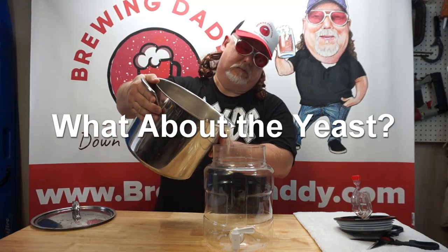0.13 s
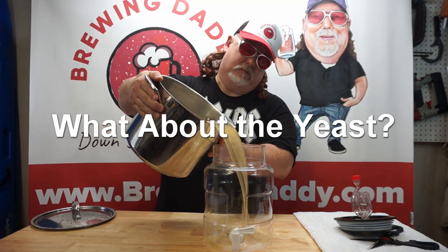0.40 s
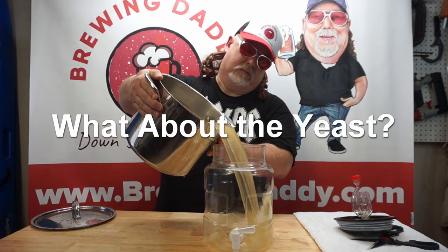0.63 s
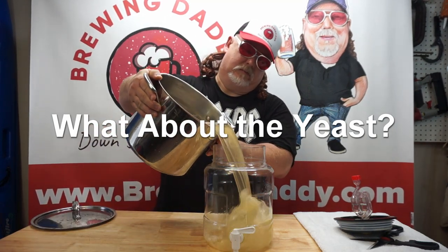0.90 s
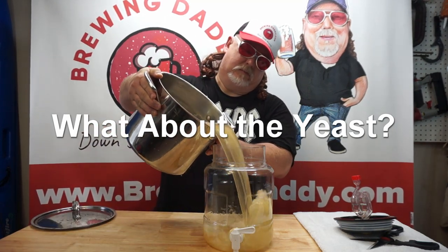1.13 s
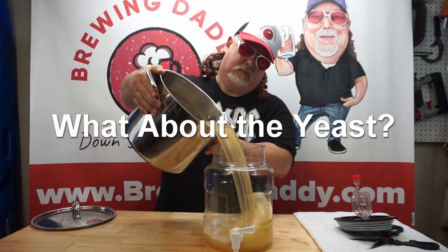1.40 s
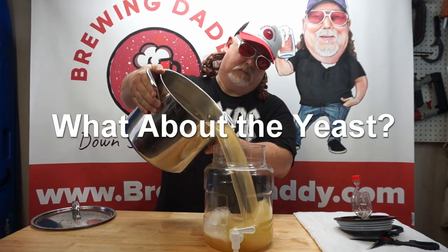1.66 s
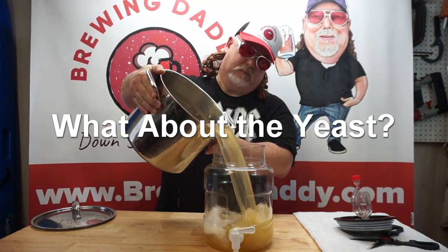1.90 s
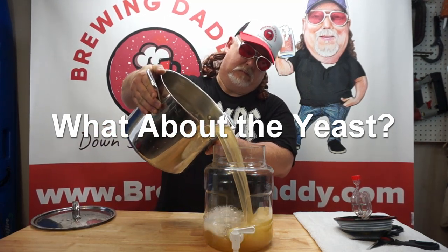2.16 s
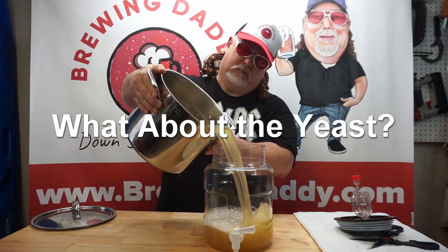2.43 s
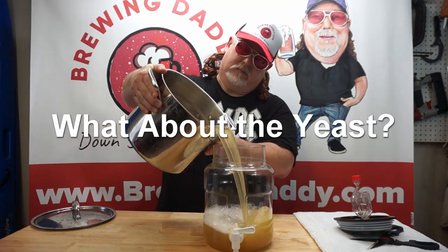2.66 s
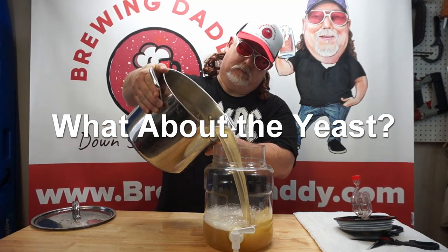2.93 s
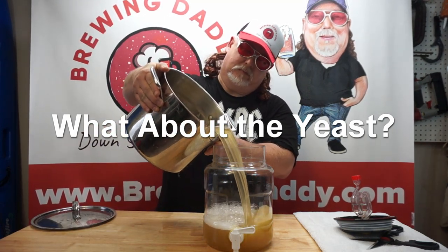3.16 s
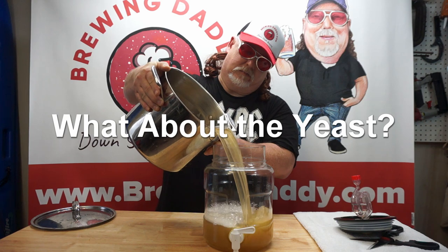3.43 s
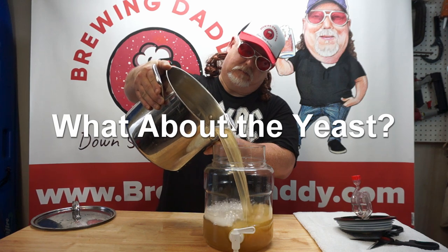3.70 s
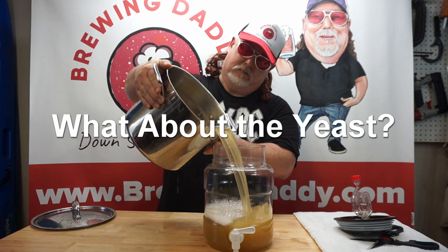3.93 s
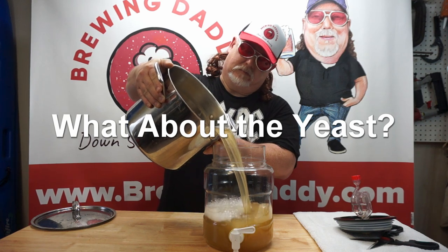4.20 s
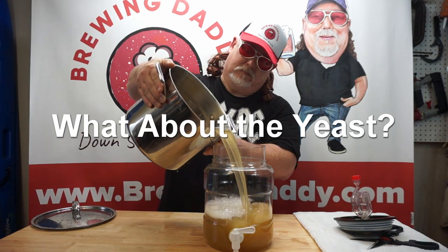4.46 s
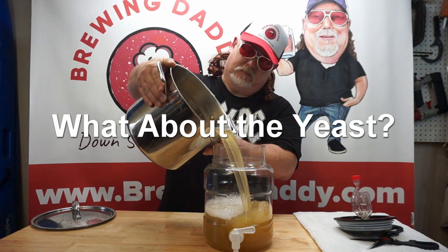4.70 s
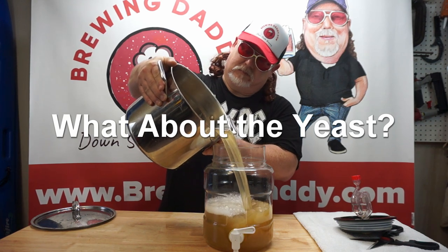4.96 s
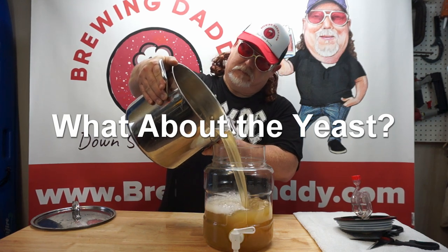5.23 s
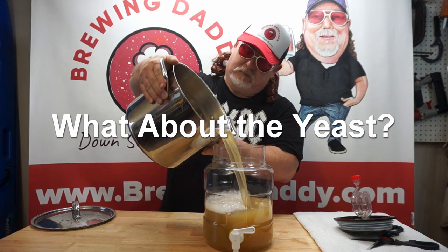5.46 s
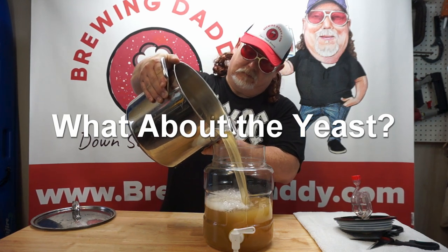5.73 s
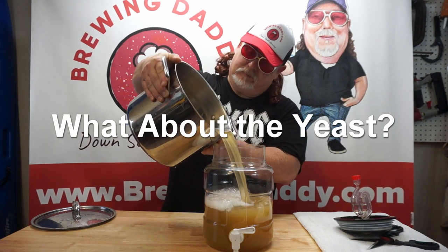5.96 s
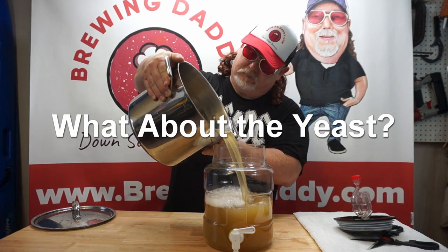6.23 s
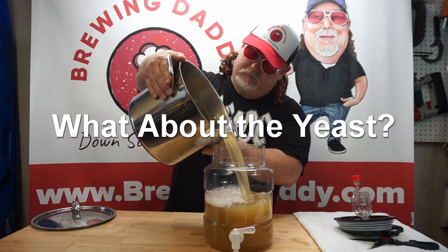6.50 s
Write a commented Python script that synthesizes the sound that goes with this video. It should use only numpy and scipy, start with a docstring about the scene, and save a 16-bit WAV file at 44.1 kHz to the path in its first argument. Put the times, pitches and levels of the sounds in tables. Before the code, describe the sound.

Close stereo sound of liquid poured into a wide, hollow plastic jar in a quiet, lightly echoing room. Only soft low room noise and hiss until 0.33 s, when a first drop taps the dry bottom; sharper, ringing knocks follow around 0.5 s. From 0.55 s bright splatter and bubble plips build, with an uneven hollow gurgle. Between 1.0 and 2.4 s the pour is fullest: dense mid-pitched bubbling, crackling spray, jar walls drumming, and deep dull thumps near 250 Hz, strongest at 1.5, 1.8 and 2.1 s. After 2.5 s it fades as foam covers the surface; lesser, slightly higher thuds come at 2.9, 3.4 and 3.9 s among isolated droplets. From 4.2 s only a soft, fizzy trickle remains, with small bubble flurries and faint plips, growing quieter but still running at 6.6 s.

```python
"""Liquid is poured from a steel pot into a wide plastic jar on a table in a quiet room.
First a few drops knock on the dry bottom, which rings as a set of dying tones.
Then the jet drums on the empty jar (noise through wall tones), and slugs of liquid thump it (low dying tones).
Trapped bubbles ring in the jar's air (swarms of short sines) and spray crackles (tiny, high rings and bursts).
As foam builds up the splashing sinks to a soft fizz with single plips; quiet room noise runs throughout."""
import sys
import numpy as np
from scipy import signal
from scipy.fft import rfft, irfft, next_fast_len
from scipy.io import wavfile
from scipy.ndimage import uniform_filter1d

SR = 44100
rng = np.random.default_rng(int(sys.argv[2]) if len(sys.argv) > 2 else 0)


def put_to_file(sound):
    """Save the sound as 16-bit audio at rate SR, in the file named by the first command-line argument."""
    columns = np.atleast_2d(sound).T  # one column per channel
    safe = np.clip(columns, -1, 1)
    whole_steps = np.round(safe * 32767)
    wavfile.write(sys.argv[1], SR, whole_steps.astype(np.int16))


def gain_from_db(level_db):
    """Turn a decibel level (scalar or array-like) into a linear amplitude factor."""
    decades = np.asarray(level_db, float) / 20
    return 10 ** decades


N = 291589  # length in samples

# Table levels are relative: the functions below add their own offsets.
# First drops on the dry bottom: start_s, level_db, tilt_db_per_octave
DRY_DROPS = [(.3252, -45, 0), (.3376, -26.5, 1), (.3444, -51, 9), (0.478, -29.5, 14), (0.5169, -19, 8.5)]
# Tones of the thin bottom: pitch_hz, level_db, t60_s (time to fall by 60 dB)
BOTTOM_TONES = [(475, 0, 0.14), (656, 4, 0.12), (902, -4, .12), (1400, -7, 0.22), (1550, -1, 0.078),
                (1930, -7, 0.13), (1930, 5.5, 0.081), (2290, -3, .08), (3050, 0, 0.074), (3300, 3, 0.035),
                (3440, -13, 0.033), (4930, -27, 0.1)]
# Level of the small bubbles: time_s, level_db
BUBBLE_LEVEL = [(0.33, -55), (0.35, -42.5), (0.45, -58.5), (0.52, -33), (0.59, -35.5), (0.75, -26),
                (0.77, -30.5), (0.85, -29.5), (0.98, -32), (1.1, -25), (1.12, -31.5), (1.24, -34),
                (1.36, -29.5), (1.5, -29), (1.52, -27.5), (2.08, -32.5), (2.18, -39.5), (2.24, -36),
                (2.86, -43.5), (3.95, -43), (3.98, -38.5), (4.06, -46), (4.11, -40), (4.16, -46.5),
                (5.11, -55), (6.61, -59)]
# Level of the big air pockets, which the slosh follows: time_s, level_db
POCKET_LEVEL = [(0.33, -56), (0.35, -46), (0.38, -51), (1.05, -33.5), (1.1, -30), (1.26, -40.5),
                (1.32, -33), (1.85, -32), (2.86, -50.5), (2.9, -45.5), (3.13, -52.5), (3.18, -46),
                (4.0, -45.5), (4.32, -57), (4.35, -51), (4.4, -55), (4.65, -60.5), (6.61, -81.5)]
# Clusters of bubbles that boil up through the foam: start_s, lift_db
BUBBLE_SURGES = [(1.67, 6), (1.94, 2), (2.06, -0.5), (2.42, 2), (2.6, 1.5), (2.75, 5.5), (3.0, 2), (3.2, 1),
                 (3.43, 1.5), (3.75, 1.5), (4.37, 5.5), (4.53, 2), (4.69, 3.5), (4.83, 7), (5.08, 4),
                 (5.17, 3), (5.34, 6.5), (5.6, 3.5), (5.77, 0), (5.85, 2), (6.11, 3.5), (6.22, 4.5),
                 (6.38, 1), (6.55, 7)]
# Loudest single bubbles: start_s, level_db, pitch_hz, t60_s
LOUD_PLIPS = [(0.5176, -27, 2380, 0.052), (.5473, -19, 2090, 0.017), (0.6178, -22.5, 2700, 0.033),
              (0.7355, -17.5, 3150, 0.017), (.8636, -15.5, 2140, 0.022), (1.0176, -21, 2740, 0.063),
              (1.0883, -24, 904, 0.11), (1.332, -20.5, 1670, 0.048), (1.3629, -18, 1696, 0.043),
              (1.52, -18, 1653, 0.067), (1.576, -21, 1600, .032), (1.6145, -13.5, 1560, 0.049),
              (1.7436, -13.5, 2050, 0.022), (2.241, -24, 1640, 0.031), (2.325, -26, 2860, 0.036),
              (2.642, -29.5, 1550, 0.054), (2.9305, -34, 1020, .048), (3.004, -32.5, 2200, .04),
              (3.4351, -28.5, 1100, 0.025), (3.7416, -36.5, 1130, 0.099), (3.9768, -33, 2724, 0.1),
              (4.305, -47, 2420, .027), (4.344, -36.5, 1130, 0.13), (4.5324, -34.5, 2540, 0.038),
              (4.6279, -39, 2380, .032), (4.69, -47, 2750, .06), (4.833, -42, 3040, 0.05),
              (5.36, -50, 2700, .04), (5.6, -48, 2030, 0.12), (5.846, -38, 2000, 0.054),
              (5.99, -44.5, 1990, 0.036), (6.2343, -45, 2450, 0.028), (6.5661, -39.5, 2000, 0.058)]
# Spectrum of the small bubbles: frequency_hz, level_db_per_hz
BUBBLE_SPECTRUM = [(820, -35), (1400, -18.5), (1640, -2.5), (1900, -6), (2070, -1), (2500, -2),
                   (2720, -1.5), (4500, -19), (5850, -113), (9900, -120)]
# Air pockets in shallow liquid: frequency_hz, level_db_per_hz
SHALLOW_POCKETS = [(240, -29), (400, -3.5), (488, -7), (568, -4), (644, -7.5), (906, -6), (1400, -10),
                   (1820, -20), (3080, -120)]
# Air pockets in deep liquid: frequency_hz, level_db_per_hz
DEEP_POCKETS = [(240, -34), (400, -11.5), (461, -17), (560, -10), (669, -9.5), (851, -14.5), (1100, -5),
                (1400, -14.5), (1820, -18), (3080, -120)]
# How far the pockets have turned into deep-liquid ones: time_s, share_0_to_1
DEEP_SHARE = [(1.7, 0), (2.6, 1)]
# Tones of the air inside the jar: pitch_hz, width_hz, level_db over the open sound
AIR_TONES = [(443, 140, -5.5), (563, 12.3, 2), (923, 12, -1), (1106, 13.6, 4.5), (1130, 12, -17),
             (1255, 57, -2), (1464, 470, -12), (2000, 35, -9), (2380, 23, -9), (2726, 26, -7),
             (3040, 7.5, -22)]
# Foam smothers the treble: time_s, spray_db over bubbling, mist_db over bubbling
FOAM_COVER = [(.33, -6, -6.5), (.42, -16, -16), (.48, -16, -13), (.7, -7.5, -9.5), (1.1, -14, -14),
              (1.25, -7.5, -8.5), (1.6, -13.5, -14.5), (2.05, -11.5, -13.5), (2.25, -15, -13.5),
              (2.45, -18, -24), (2.8, -16.5, -21.5), (3.1, -18, -27), (3.5, -15, -20), (3.8, -22.5, -21),
              (4.1, -15.5, -25), (5, -14, -22.5), (6.61, -12, -34)]
# Sharp drops of spray: start_s, level_db, pitch_hz
SPRAY_TICKS = [(0.4646, -34.5, 8410), (.4851, -33, 10300), (0.517, -35, 9500), (0.547, -31, 8000),
               (0.5576, -21.5, 5320), (0.6187, -24, 4240), (0.9305, -28, 8900), (.998, -24.5, 4370),
               (1.2574, -31, 4760), (2.1885, -27.5, 5970), (2.266, -29, 4320), (2.4806, -34.5, 4680),
               (2.5235, -41, 9200), (2.6088, -29, 4180), (2.763, -33, 5300), (2.8028, -43, 10000),
               (3.038, -45, 6240), (3.203, -40, 5200), (3.4433, -36, 5930), (3.6344, -35, 5560),
               (3.7128, -34, 5970), (3.7628, -29.5, 6700), (3.8075, -44, 8200), (3.839, -39, 5700),
               (3.988, -40, 4540), (4.099, -43, 5450), (4.3868, -46, 5950), (4.406, -37.5, 5200),
               (4.67, -39, 4280), (5.5591, -41.5, 4360), (5.9467, -49, 4740)]
# Lift from the burst of smaller drops around each tick: spray_db, mist_db
SPATTER_LIFT = [5.5, 2]
# Spectrum of the spray: frequency_hz, level_db_per_hz
SPRAY_SPECTRUM = [(2650, -30), (4500, 3.5), (5140, 5), (5920, 6), (6470, 1.5), (7020, 2.5), (7500, -30),
                  (9750, -41), (16500, -120)]
# Spectrum of the finest drops: frequency_hz, level_db_per_hz
MIST_SPECTRUM = [(4410, -30), (7500, 2), (10000, 1), (13200, -13), (15600, -20)]
# Spectrum of bursting foam cells: frequency_hz, level_db_per_hz
FIZZ_SPECTRUM = [(4600, -25), (5200, -7), (5600, 2.5), (5950, -4.5), (6400, 0), (6900, -12), (7500, -30)]
# Thrust of the jet on the jar: time_s, level_db
JET_THRUST = [(.33, -46), (.45, -47), (.55, -54.5), (.8, -40.5), (1.2, -42.5), (1.33, -26.5), (1.45, -32.5),
              (1.6, -29), (1.9, -29), (2.15, -33), (2.45, -44), (2.551, -39), (2.8, -45.5), (3.1, -48.5),
              (3.25, -39.5), (3.33, -53), (3.4, -36.5), (3.55, -40.5), (3.65, -48.5), (3.85, -43),
              (3.93, -40), (4.2, -49.5), (4.5, -62), (4.7, -67), (5.2, -76), (5.4, -61), (5.7, -75),
              (6.61, -71)]
# Part of the thrust that shakes the empty jar, not the loaded one: time_s, share_0_to_1
EMPTY_SHARE = [(.3, 0.82), (1.2, 0.99), (1.9, 0.64), (2.3, 0.4), (2.7, 0.09), (4, 0), (4.6, 0.06),
               (6.6, 0.3)]
# Slugs of liquid that thump the jar: start_s, level_db, pitch_hz, t60_s
SLUG_THUMPS = [(0.335, -34, 253, 0.18), (0.822, -32, 245, 0.15), (1.016, -27, 263, 0.13),
               (1.128, -22.5, 247, 0.17), (1.28, -35, 242, 0.12), (1.329, -21.5, 253, 0.24),
               (1.518, -12.5, 238, 0.11), (1.612, -19.5, 281, 0.21), (1.706, -18.5, 266, 0.07),
               (1.811, -8, 264, 0.11), (1.942, -22, 260, 0.13), (2.108, -12.5, 266, 0.065),
               (2.206, -13.5, 284.4, 0.11), (2.329, -25.5, 263, 0.14), (2.377, -18, 296, 0.075),
               (2.481, -20.5, 281, 0.11), (2.588, -28.5, 288.3, 0.33), (2.663, -21, 276, 0.073),
               (2.889, -23.5, 286, 0.18), (2.939, -16.5, 282.6, 0.13), (3.156, -31.5, 313, 0.15),
               (3.442, -20.5, 285, 0.15), (3.878, -21, 290, 0.25), (3.973, -37, 276, 0.21)]
# Wall and table tones: pitch_hz, width_hz (before widening), empty_db, loaded_db
WALL_TONES = [(95, 15, -16.5, -39), (203, 10, -4.5, -36), (247, 17.8, 1.5, -14), (288.3, 13.1, -9.5, 8),
              (294.4, 103, -17, 1.5), (373.4, 8.9, -5, -36), (399.6, 17, -8.5, -45)]
# Slosh rumble over the pockets: time_s, level_db
SLOSH_LEVEL = [(.33, -9), (1, -17.5), (1.7, -14), (2.7, -9.5), (3.5, -16), (4.3, -9.5), (5.3, -5.5),
               (6.61, 8)]
# Spectrum of the slosh: frequency_hz, level_db_per_hz
SLOSH_SPECTRUM = [(30, -26), (70, -8), (95, 4.5), (140, 2.5), (250, -3), (400, -0.5), (600, -48),
                  (1000, -60)]
# How long the room echoes: frequency_hz, t60_s
ECHO_TIMES = [(100, 0.13), (500, 0.59), (2000, 0.47), (6000, 0.59), (14000, 0.13)]
# Echo over the direct sound: frequency_hz, level_db
ECHO_LEVELS = [(60, -26), (250, -24), (420, -14), (700, -9), (1200, -7), (2000, -6), (3200, -3), (4500, 4),
               (6500, 1), (9000, 0), (14000, 1)]
# Room air and microphone hiss: frequency_hz, level_db_per_hz
HUSH_SPECTRUM = [(15, -43), (25, -2), (70, -9.5), (129, -9), (169, -6.5), (227, -5), (616, -8.5),
                 (947, -12), (6410, -24.5), (11300, -26.5), (15600, -32)]
# Left-right likeness of that noise: frequency_hz, likeness_0_to_1
HUSH_LIKENESS = [(50, 0.77), (300, 0.1), (1500, 0.067), (5000, 0.067), (15000, 0.033)]
# Balance of the two ports: frequency_hz, left_minus_right_db
PORT_BALANCE = [(60, -1), (180, -0.5), (550, -1), (1650, -4.5), (4970, -3.5), (15000, -3.0)]
# How far the left port is ahead: frequency_hz, lead_radians
PORT_LEAD = [(60, 0), (400, .05), (1000, .15), (2000, .33), (2800, .3), (4400, 1.1), (5800, .3), (9000, .1),
             (15000, 0)]


def evened(x):
    """Scales to rms 1."""
    return x / np.sqrt(np.mean(x ** 2) + 1e-20)


def read(points, hz):
    """Reads a spectrum on a log-frequency axis."""
    f, value = np.transpose(points)
    return np.interp(np.log(hz + 1), np.log(f + 1), value)


def curve(rows):
    """Joins table rows into one value a sample; each end row holds beyond its time."""
    s, *columns = np.transpose(rows)
    return [np.interp(np.arange(N) / SR, s, c) for c in columns]


def swells(rows, rise_s, fall_s):
    """One swell a row, 0-1: a quick rise from its start, then it sinks."""
    t = np.arange(N) / SR - np.array([row[0] for row in rows])[:, None]
    return np.clip(t / rise_s, 0, 1) * np.exp(-np.maximum(t - rise_s, 0) / fall_s)


def add(mix, s, sound):
    """Mixes a sound in at a time in seconds."""
    part = mix[round(s * SR):][:len(sound)]
    part += sound[:len(part)]


def coloured(x, points):
    """Filters by a spectrum in dB."""
    size = next_fast_len(x.shape[-1])
    gain = gain_from_db(read(points, np.fft.rfftfreq(size, 1 / SR)))
    return irfft(rfft(x, size) * gain, size)[..., :x.shape[-1]]


def resonate(x, hz, width):
    """One resonance with a gain of about 1 at its pitch; width in Hz."""
    pole = np.exp((2j * np.pi * hz - np.pi * width) / SR)
    return 2 * signal.lfilter([1 - abs(pole)], [1, -pole], x).real


def ring(hz, t60, glide, rise_s):
    """A dying sine; with glide its pitch climbs, as a bubble's does when it nears the surface."""
    t = np.arange(round(max(t60, .002) * SR)) / SR
    tone = np.sin(2 * np.pi * hz * t * (1 + glide * t / t60))
    return tone * gain_from_db(-60 * t / t60) * (1 - np.exp(-t / rise_s))


def slap(hz, spread, t60):
    """A short burst of noise about a pitch, peak 1; spread is the width as a share of the pitch."""
    t = np.arange(round(t60 * SR)) / SR
    burst = rng.standard_normal(len(t)) * gain_from_db(-60 * t / t60)
    burst = resonate(resonate(burst, hz, spread * hz), hz, spread * hz)
    return burst / abs(burst).max()


def swarm(spectrum, level_db, per_s, cycles, spread_db, clump_db, patch_db, count=36):
    """Rings of many sizes, a few large; they clump as the surface heaves, and come in patches of like size."""
    lo_hz, hi_hz = spectrum[1][0], spectrum[-2][0]
    # slow random curves, one value per 128 samples
    chance = uniform_filter1d(rng.standard_normal((N // 128 + 1, count + 1)), size=7, axis=0)
    heave = evened(chance[:, -1])
    patches = evened(uniform_filter1d(chance[:, :-1], size=7, axis=1))
    happens = rng.random(N) < per_s / SR
    size = gain_from_db(spread_db * np.minimum(rng.exponential(1, N), 5)) * happens
    kind = rng.integers(0, count, N)  # which pitch each ring gets
    frame = np.arange(N) // 128
    grouping_db = clump_db * heave[frame] + patch_db * patches[frame, kind]
    train = evened(size * gain_from_db(grouping_db)) * gain_from_db(level_db)
    pitches = np.geomspace(lo_hz, hi_hz, count)
    shares = gain_from_db(read(spectrum, pitches)) * np.sqrt(pitches)  # sizes are spread evenly in octaves
    out = np.zeros(N)
    for k, hz in enumerate(pitches):
        t60 = cycles * rng.uniform(0.85, 1.88) / hz
        bubble = ring(hz, t60, rng.uniform(0, 0.12), .5 / hz)
        bubble *= shares[k] / np.linalg.norm(bubble)
        out += signal.oaconvolve(train * (kind == k), bubble)[:N]
    return out / np.sqrt(np.mean(shares ** 2))


def bubbling(level_db, pockets_db):
    """Small bubbles, large air pockets and single plips, all ringing the air in the jar."""
    out = swarm(BUBBLE_SPECTRUM, level_db - 1.5, 3000, 16.6, 0.67, 0.39, 1.35, count=48)
    deep = np.clip(curve(DEEP_SHARE)[0], 1e-4, 1 - 1e-4)
    shallow_db = pockets_db + 10 * np.log10(1 - deep) - 4
    deep_db = pockets_db + 10 * np.log10(deep) - 4
    out += swarm(SHALLOW_POCKETS, shallow_db, 1500, 15.3, 2.74, 0.3, 2.35, count=24)
    out += swarm(DEEP_POCKETS, deep_db, 2500, 23, 3.1, 1.15, 3.5, count=24)
    # scattered bubbles that ring longer
    out += swarm(BUBBLE_SPECTRUM, level_db - 9, 150, 64, 1.1, 2.3, 0.2, count=20)
    for s, db, hz, t60 in LOUD_PLIPS:
        add(out, s, gain_from_db(db) * ring(hz, t60, 0.029, 0.001))
        add(out, s, gain_from_db(db - 6.5) * slap(hz, 0.89, 0.095))  # slap of the surface
    return out + sum(gain_from_db(db) * resonate(out, hz, width) for hz, width, db in AIR_TONES)


def spray(spray_db, mist_db):
    """Tiny drops crackle as short high rings and bursts; bursting foam cells fizz as the liquid deepens."""
    out = swarm(SPRAY_SPECTRUM, spray_db - 8.5, 3000, 6.7, 2.1, 2.8, 0.8, count=40)
    out += swarm(MIST_SPECTRUM, mist_db - 3.5, 7000, 9.2, 1.7, 3.2, 0.73, count=48)
    # scattered larger drops
    out += swarm(SPRAY_SPECTRUM, spray_db - 6.5, 200, 48, 2.7, 2.1, 0.54, count=20)
    out += swarm(MIST_SPECTRUM, mist_db - 13, 250, 8.6, 3.9, 1.3, 0.98, count=20)
    foam_db = 10 * np.log10(np.clip(curve(DEEP_SHARE)[0], 1e-4, 1))
    out += swarm(FIZZ_SPECTRUM, spray_db + foam_db - 7, 350, 50, 3.6, 2.5, 2.3, count=16)
    # one drop bursts with a brighter snap than the rest
    add(out, 3.7635, gain_from_db(-37) * slap(12000, .5, 0.013))
    for s, db, hz in SPRAY_TICKS:
        add(out, s, gain_from_db(db) * ring(hz, .006, .05, .00015))
        add(out, s, gain_from_db(db - 1) * slap(hz, 0.53, 0.014))  # crack of the drop
    return out


def jar(thrust_db):
    """The uneven jet shakes the walls, whose tones change as the jar fills; slugs thump it."""
    empty = curve(EMPTY_SHARE)[0]
    hits = rng.random(N) < 900 / SR  # about 900 a second
    strength = gain_from_db(2.25 * np.minimum(rng.exponential(1, N), 4))
    jet = evened(strength * rng.standard_normal(N) * hits)
    bare, loaded = np.zeros(N), np.zeros(N)
    for hz, width, empty_db, loaded_db in WALL_TONES:
        tone = resonate(resonate(jet, hz, 1.16 * width), hz, 1.16 * width) / np.sqrt(width)
        bare += gain_from_db(empty_db) * tone
        loaded += gain_from_db(loaded_db) * tone
    bare, loaded = evened(bare), evened(loaded)
    # the heavy jar hums more evenly
    loaded = evened(loaded / (uniform_filter1d(loaded ** 2, size=500) + 0.055) ** 0.14)
    drumming = gain_from_db(thrust_db - 2) * (np.sqrt(empty) * bare + np.sqrt(1 - empty) * loaded)
    thumps, broken = np.zeros(N), np.zeros(N)
    for s, db, hz, t60 in SLUG_THUMPS:
        add(thumps, s, gain_from_db(db) * ring(hz, t60, 0, 0.011))
        add(broken, s, signal.windows.tukey(round(0.49 * t60 * SR), .5))
    # a slug weakens the steady jet while it lands
    return thumps + drumming * (1 - np.clip(0.18 * broken, 0, 1))


def knocks():
    """Each first drop rings the thin bottom; the tilt lifts the high tones, as small drops do."""
    out = np.zeros(N)
    for s, db, tilt_db in DRY_DROPS:
        rung = np.zeros(SR // 2)
        for hz, tone_db, t60 in BOTTOM_TONES:
            sign = rng.choice([-1, 1])
            octaves = np.log2(hz / BOTTOM_TONES[0][0])
            add(rung, 0, sign * gain_from_db(tone_db + tilt_db * octaves) * ring(hz, t60, 0, 0.00048))
        add(out, s, gain_from_db(db) * rung / abs(rung).max())
        add(out, s, gain_from_db(db + 0.5) * slap(2630, 0.84, 0.022))
    return out


def slosh(level_db):
    """The moving mass of liquid rumbles through the table, as low filtered noise."""
    return gain_from_db(level_db + 3) * evened(coloured(rng.standard_normal(N), SLOSH_SPECTRUM))


def room(x, count=3):
    """Sparse random echoes, each band dying at its own speed, in several tails that fade in and out in turn."""
    taps = np.zeros((count, 2, SR // 2))
    at = np.arange(120, SR // 2 - 20, 20)
    at = at + rng.integers(0, 20, (count, 2, len(at)))
    np.put_along_axis(taps, at, rng.choice([-1., 1.], at.shape), -1)
    hz, t, z = signal.stft(taps, SR, nperseg=256)
    z *= gain_from_db(-60 * t / read(ECHO_TIMES, hz)[:, None])
    z /= np.sqrt(uniform_filter1d((abs(z) ** 2).sum(-1), size=9))[..., None]  # evens the energy of the bands
    tails = signal.istft(z, SR, nperseg=256)[1]
    tails /= np.linalg.norm(tails[0, 0])
    # the tails take turns so that no fixed tones stand out; squares of the windows sum to 1
    turn = np.pi * (2.282 * np.arange(N) / SR + np.arange(count)[:, None] / count)
    fed = coloured(x, ECHO_LEVELS) * np.cos(turn) * np.sqrt(2 / count)
    return signal.fftconvolve(fed[:, None], tails, axes=-1).sum(0)[:, :N]


def hush():
    """Steady room noise, much alike in both ears only in the bass."""
    left, other = rfft(rng.standard_normal((2, N)))
    hz = np.fft.rfftfreq(N, 1 / SR)
    same = read(HUSH_LIKENESS, hz)
    right = same * left + np.sqrt(1 - same ** 2) * other
    both = np.array([left, right]) * gain_from_db(read(HUSH_SPECTRUM, hz))
    return gain_from_db(-61) * evened(irfft(both, N))


def scene():
    """Mixes the pour, its echoes and the hush; the steady layers of the pour wait until 0.33 s."""
    poured = np.where(np.arange(N) < .33 * SR, -200, 0)  # dB
    level_db = curve(BUBBLE_LEVEL)[0] + poured
    pockets_db = curve(POCKET_LEVEL)[0] + poured
    thrust_db = curve(JET_THRUST)[0] + poured
    surge_lift_db = np.transpose(BUBBLE_SURGES)[1]
    level_db = level_db + surge_lift_db @ swells(BUBBLE_SURGES, rise_s=0.0066, fall_s=0.031)
    # each slug drags extra air under
    gulp_db = 4.5 * swells(SLUG_THUMPS, rise_s=0.006, fall_s=0.04).max(0)
    spatter = swells(SPRAY_TICKS, rise_s=0.0035, fall_s=0.019).max(0)
    spray_db, mist_db = level_db + curve(FOAM_COVER) + np.c_[SPATTER_LIFT] * spatter
    pour = bubbling(level_db, pockets_db + gulp_db)
    pour += spray(spray_db, mist_db)
    pour += jar(thrust_db)
    pour += knocks()
    pour += slosh(pockets_db + curve(SLOSH_LEVEL)[0])
    return gain_from_db(-2) * (pour + room(pour)) + hush()


def roll_off(x):
    """The treble ends steeply here."""
    return signal.sosfilt(signal.butter(12, 15730, fs=SR, output="sos"), x)


def record(dry):
    """Two close ports: the left is a little quieter and ahead in phase; the deep bass is cut."""
    hz = np.fft.rfftfreq(N, 1 / SR)
    side = np.array([[.5], [-.5]])  # left, right
    ports = gain_from_db(side * read(PORT_BALANCE, hz)) * np.exp(1j * side * read(PORT_LEAD, hz))
    heard = irfft(rfft(dry) * ports, N)
    bass_cut = signal.butter(2, 50, "high", fs=SR, output="sos")
    mix = signal.sosfilt(bass_cut, heard)
    return roll_off(mix)


dry = scene()
out = record(dry)
put_to_file(out)
```